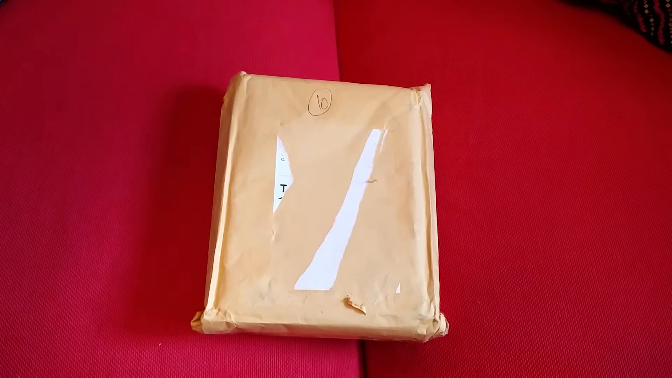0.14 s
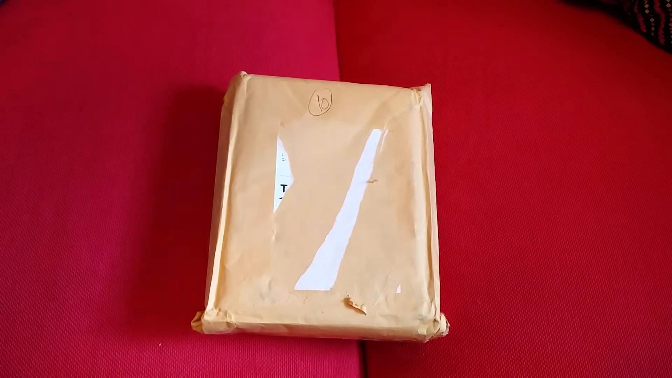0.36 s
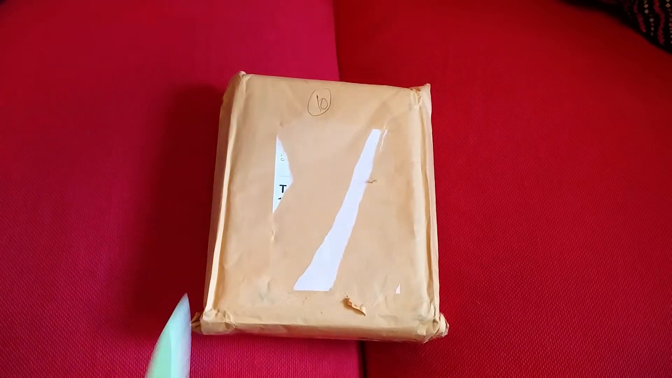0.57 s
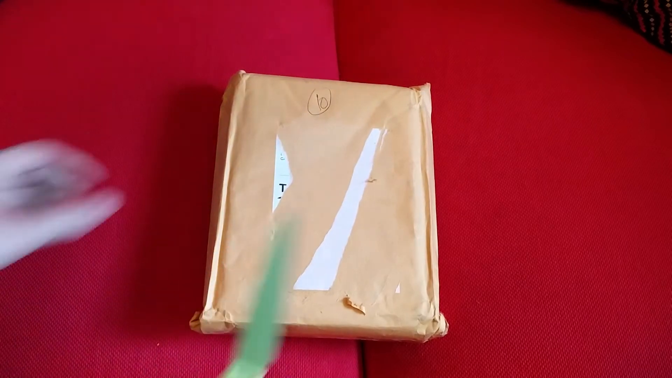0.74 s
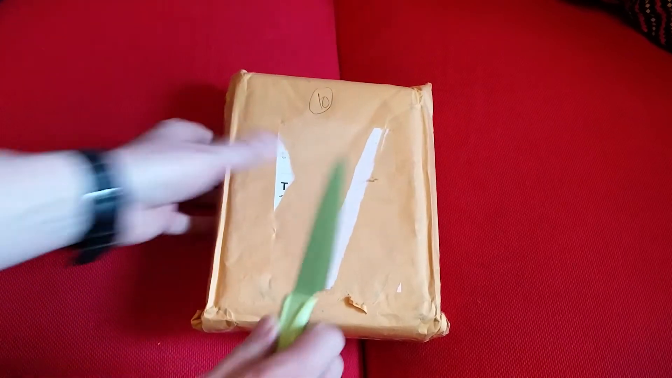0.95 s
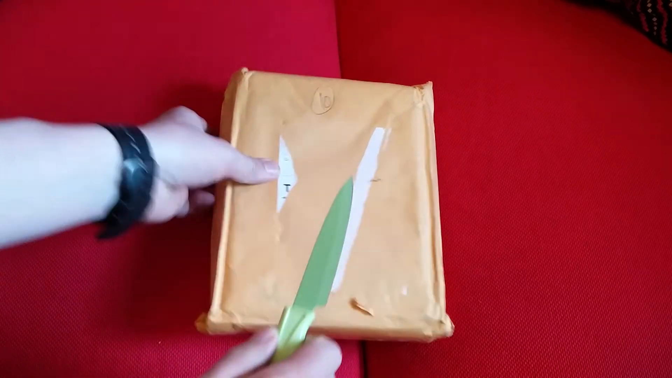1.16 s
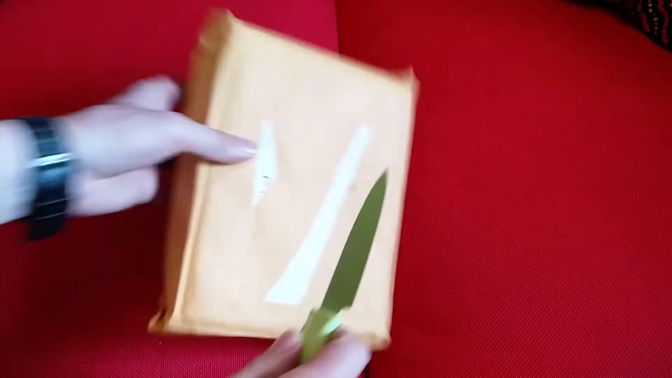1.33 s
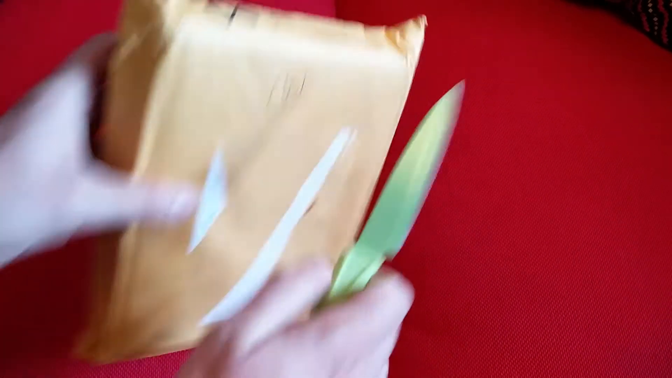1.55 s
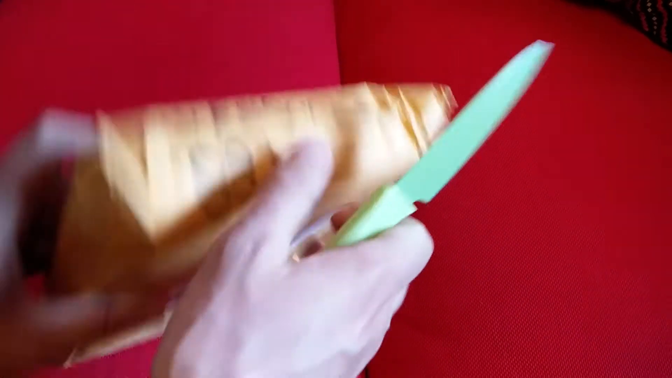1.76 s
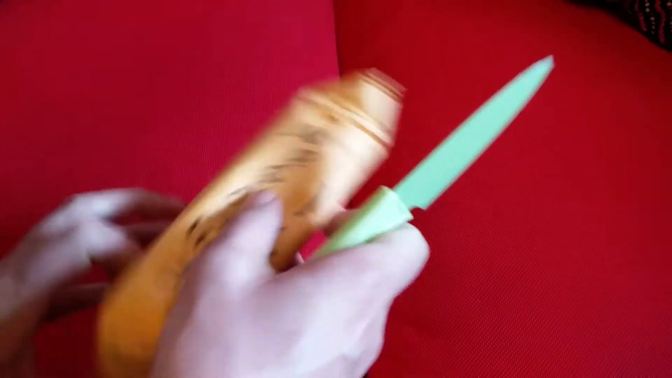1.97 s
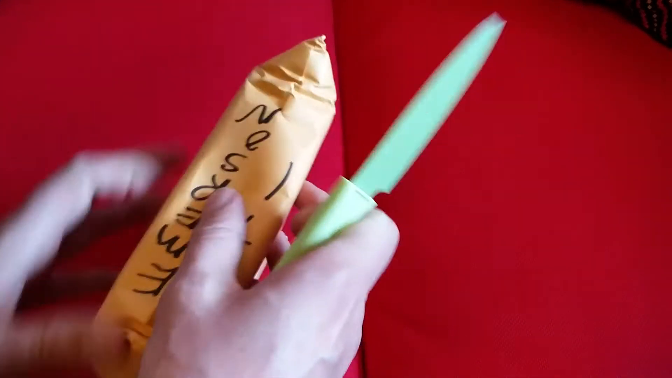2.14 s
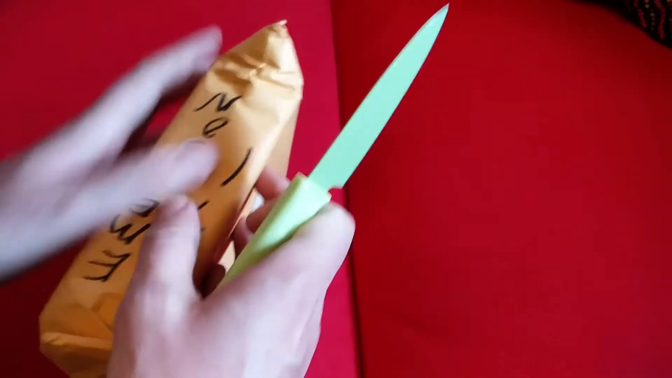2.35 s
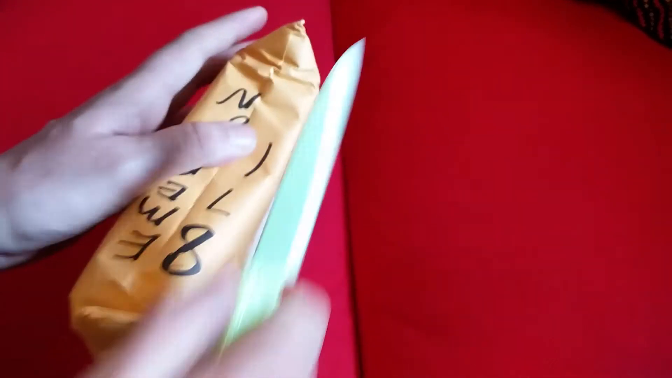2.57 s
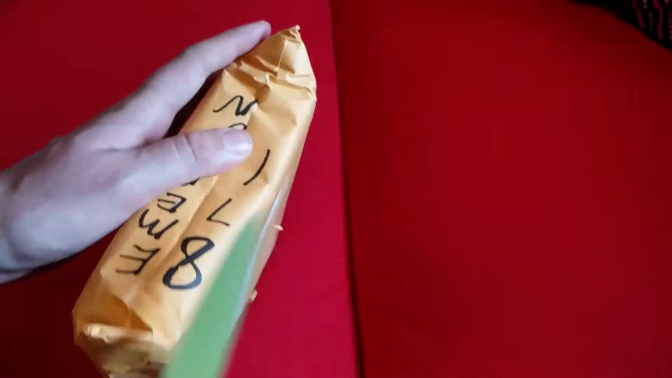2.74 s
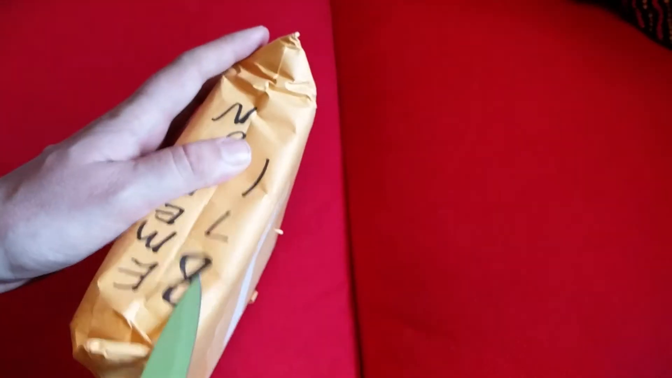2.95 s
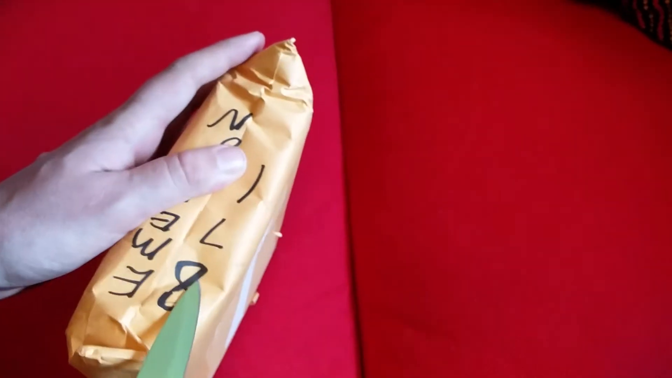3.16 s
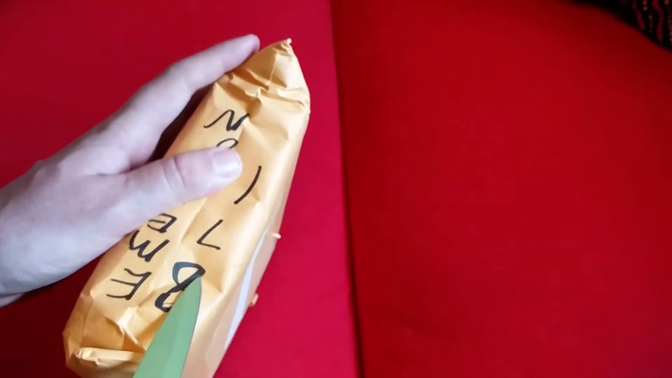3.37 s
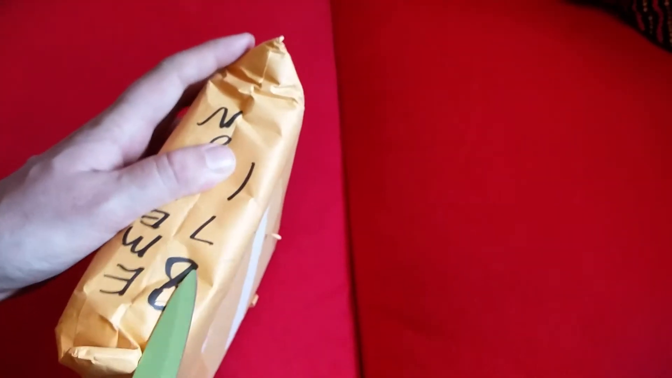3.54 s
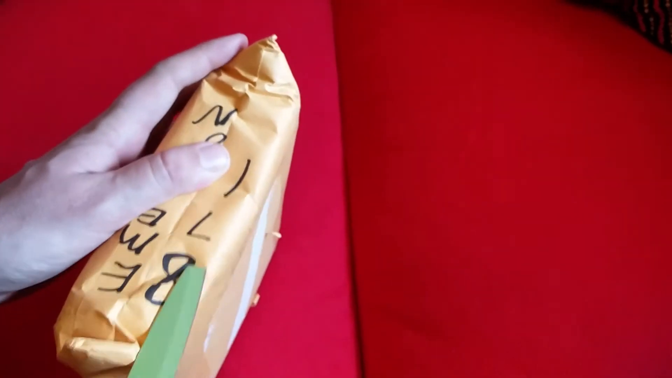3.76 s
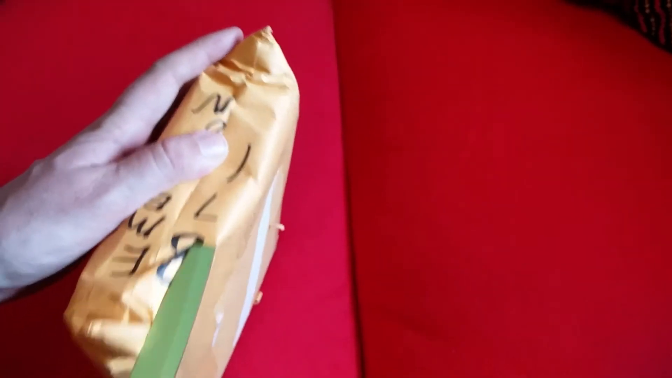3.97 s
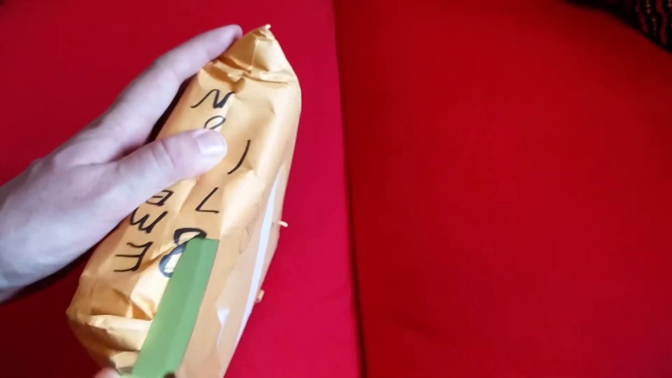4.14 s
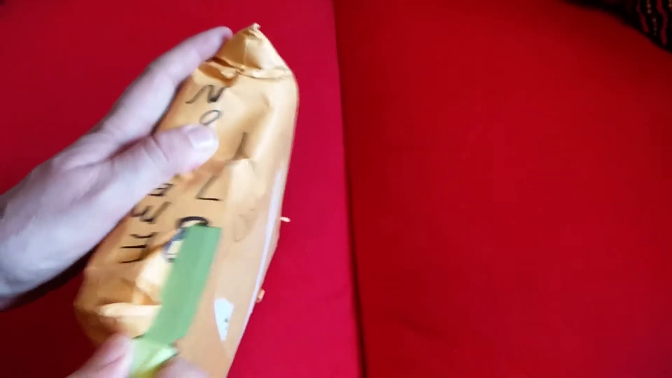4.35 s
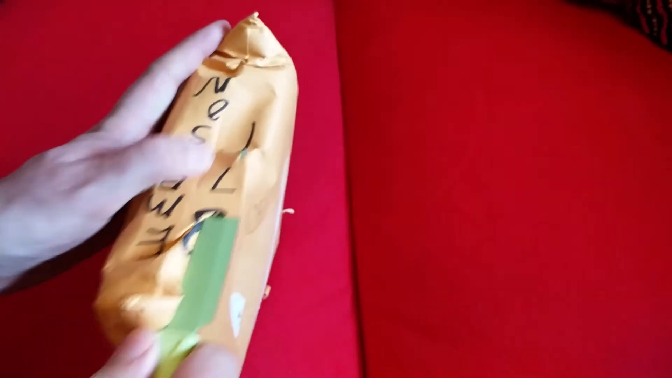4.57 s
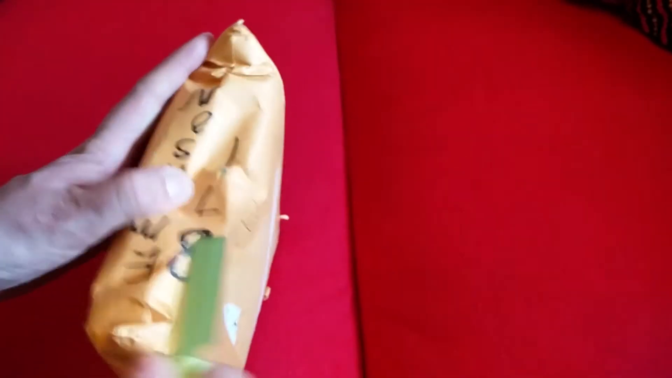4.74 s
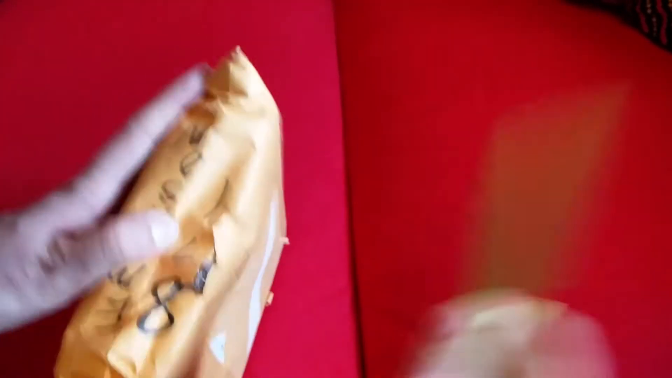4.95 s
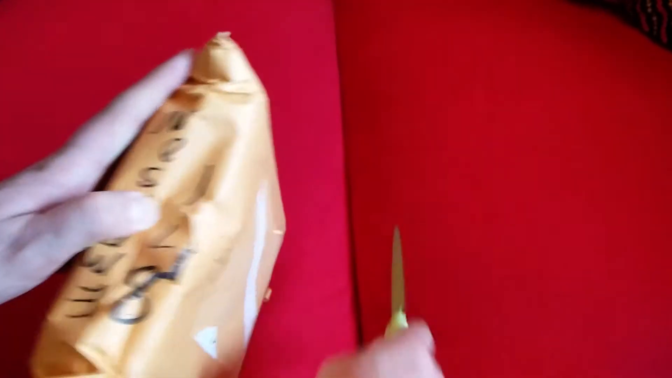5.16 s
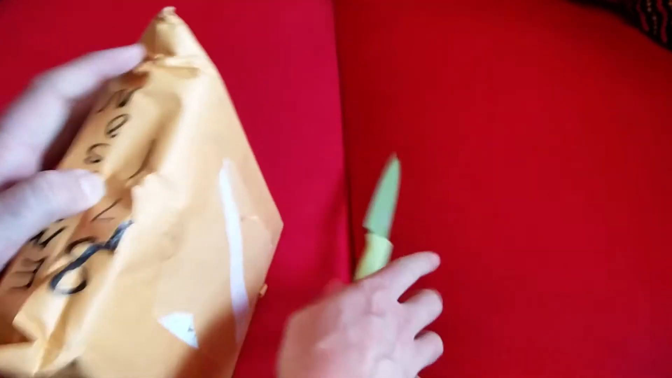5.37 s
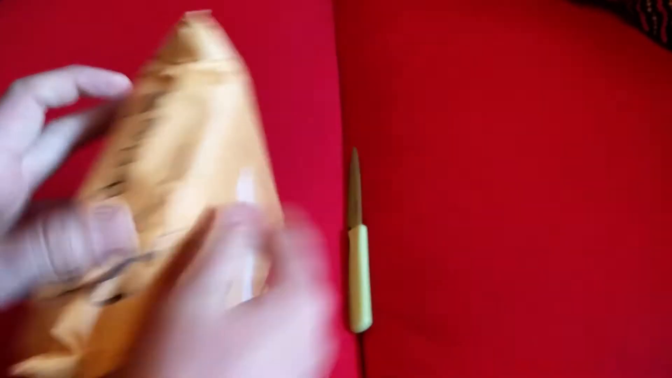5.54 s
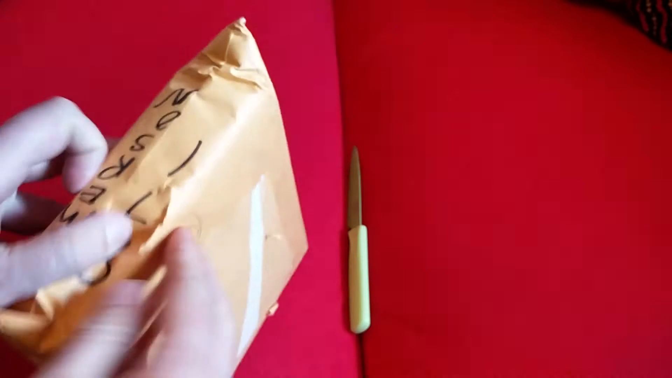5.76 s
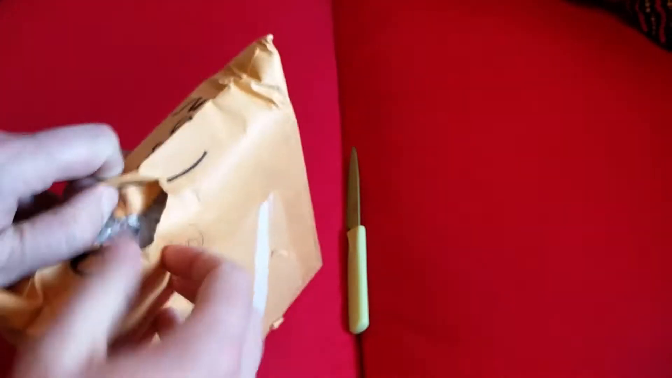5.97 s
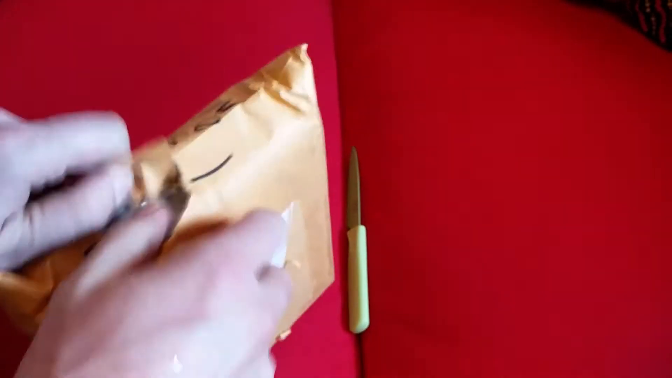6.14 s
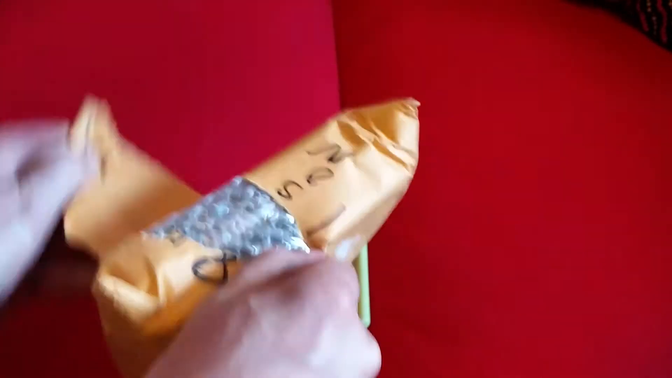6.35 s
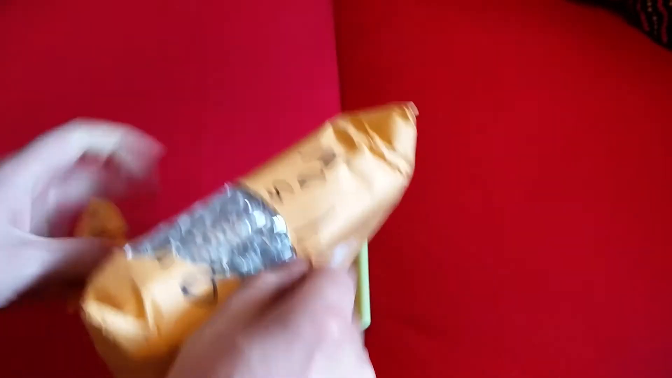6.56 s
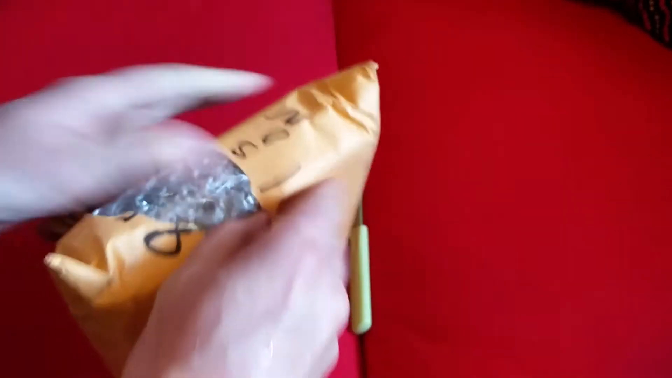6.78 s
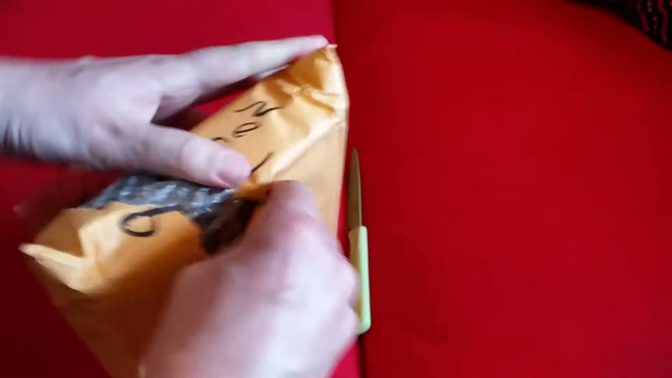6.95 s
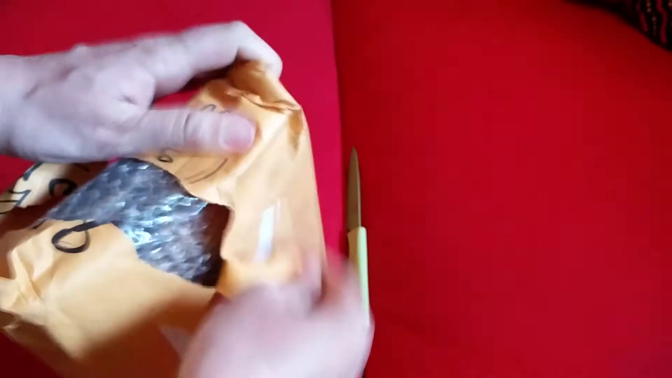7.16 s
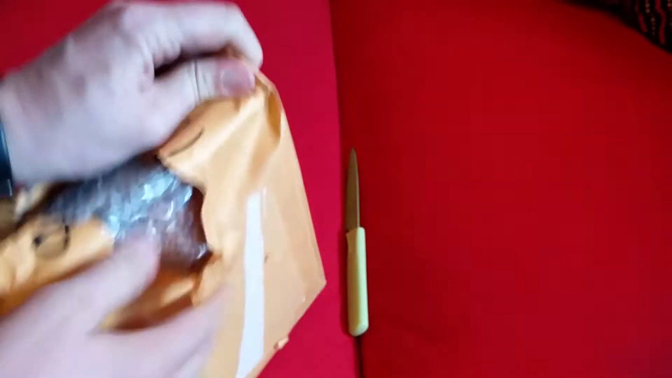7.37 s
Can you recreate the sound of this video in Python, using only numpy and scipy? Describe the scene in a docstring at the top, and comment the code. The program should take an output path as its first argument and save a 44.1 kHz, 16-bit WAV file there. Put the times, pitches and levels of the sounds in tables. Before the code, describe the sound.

Hands turn over a stiff padded paper parcel with sharp crinkles, then slit and tear it open in loud crackling rips over soft thumps.

```python
"""A padded paper parcel is lifted, turned, slit and torn by hands on a sofa in a small furnished room.
Creases snap one by one over clumped fibre crackle and panel rustle: click-started noise bursts in bands.
Small facets pop as ringing resonators; the padded body adds lumpy low noise and short sine thumps.
Two microphone ports a few centimetres apart hear it, the left one later, with soft reflections and faint air."""
import sys
import numpy as np
from scipy import signal
from scipy.fft import rfft, irfft
from scipy.io import wavfile

SR = 44100
rng = np.random.default_rng(int(sys.argv[2]) if len(sys.argv) > 2 else 0)


def bounce(signal):
    """Save signal as a 16-bit WAV file at the path given by the first command-line argument."""
    frames = np.transpose(np.atleast_2d(signal))
    limited = np.clip(frames, -1, 1)
    pcm = np.round(limited * 32767).astype(np.int16)
    wavfile.write(sys.argv[1], SR, pcm)


N = 326781

# Still air of the room. Each row: frequency in Hz, relative spectrum level in dB.
AIR_SPECTRUM = [(24, -29), (40, -6.5), (222, 5), (549, -43), (631, -3), (1000, -5), (1630, -18.5),
                (6880, -37), (10200, -38), (13300, -54), (22000, -120)]
AIR_DB = -70
# Reflections: a late tail, and first reflections off cushions and hands that start SOFA_DB above it.
ROOM_T60_S, ROOM_DB, ROOM_DULL_HZ = 0.55, -8.5, 6200
SOFA_T60_S, SOFA_DB = 0.094, 15
# Tone of the left port. Each row: frequency in Hz, level over the right port in dB.
LEFT_PORT_TONE = [(300, 0.5), (600, -3.5), (1000, 3.5), (1800, 7.5), (3200, -1.5), (5500, 1.5)]
# The hands carry the parcel across the ports. Each row: time in seconds, left over right in dB
# (centred on its mean before use), lag of the left port in milliseconds.
SIDEWAYS_PATH = [(1.2, 2.5, .14), (1.9, 1, 0.24), (2.7, 2, 0.13), (3.7, 3.5, .18), (4.4, 3.5, 0.15),
                 (5.2, 2.5, .18), (6.4, 1, .2), (7.2, 3.5, 0.12)]
CUTOFF_HZ = 10800

# Slow hold on the parcel, under all strokes. Each row: time in seconds, faint paper rustle in dB,
# padded body in dB.
GRIP_CURVE = [(0.0, -76, -66), (0.3, -79, -74.5), (0.92, -99, -94), (1.2, -80, -74), (1.6, -64, -56),
              (2.1, -49.5, -85), (2.6, -61, -55.5), (2.85, -78.5, -70), (3.35, -78, -62.5), (3.6, -71, -79),
              (4.1, -57.5, -87), (4.6, -72, -62), (5.2, -64.5, -65), (5.6, -65.5, -56), (6.1, -73, -54.5),
              (6.5, -93, -55.5), (6.77, -55, -67), (7.41, -51.5, -50)]
GRIP_FIBRE_DB = -2.5   # fibre crackle of the mere hold, over its rustle
# Strokes of fingers and blade. Each row: start in seconds, hold in seconds, panel rustle in dB,
# fibre crackle over it in dB, kneading of the padding over it in dB.
HAND_STROKES = [(0.062, 0.036, -66.5, 15, -7), (0.558, 0.029, -68, -12, -14), (0.65, 0.022, -80, -1, 13),
                (0.808, 0.066, -83, -13, 10), (0.986, 0.28, -61, -4, -1.5), (1.147, 0.1, -55, -10, -4.5),
                (1.321, 0.018, -38.5, -8.5, -7), (1.37, 0.017, -54, -18, -19),
                (1.434, 0.014, -45.5, 1.5, -14), (1.837, 0.06, -54, -2.5, -0.5),
                (1.993, 0.01, -38.5, -5, -9.5), (2.106, 0.18, -53, 4, -27),
                (2.281, 0.0087, -47.5, -14, -20), (2.406, 0.055, -57, 10.5, 6),
                (2.546, 0.13, -59.5, -3, -6), (2.94, 0.0071, -56.5, -9, -10), (3.024, 0.085, -62.5, 0, -2),
                (3.233, 0.031, -59, -1.5, -3), (3.434, 0.013, -58, -2, -14),
                (3.461, 0.013, -55.5, 5.5, -15), (3.506, 0.21, -58.5, 0, -8.5),
                (3.663, 0.14, -48, 6.5, -15), (3.942, 0.095, -54, 9.5, -16),
                (4.139, 0.069, -45.5, 3.5, -30), (4.227, 0.086, -55.5, 6.5, -18),
                (4.307, 0.062, -44, -0.5, -4.5), (4.426, 0.074, -50.5, 5, -15),
                (4.52, 0.19, -65, 11.5, -11), (4.744, 0.009, -50, -2, 2.5), (4.826, 0.074, -43.5, 4, -13),
                (4.898, 0.0054, -33.5, -7, -4.5), (5.269, 0.036, -67.5, 9, -22),
                (5.478, 0.0049, -43, -17, 1.5), (5.53, 0.0069, -50.5, 1, -8),
                (5.645, 0.094, -48, -1.5, -16), (5.782, 0.19, -46.5, 1, -7), (5.983, 0.042, -45.5, -34, 0),
                (6.17, 0.2, -39, 4, -18), (6.306, 0.042, -27, 5.5, -7), (6.54, 0.15, -52, 8, -5),
                (6.862, 0.09, -46, 6, 2), (6.977, 0.034, -34.5, 5.5, -9.5), (7.06, 0.068, -38.5, -16, -6),
                (7.112, 0.045, -34, 5.5, -5), (7.169, 0.082, -38.5, 2.5, -29), (7.356, .05, -62, 14, -7)]
ATTACK_DB_PER_S, PANEL_RELEASE_DB_PER_S, FIBRE_RELEASE_DB_PER_S = 359.5, 193.5, 210
ROLL_DB, ROLL_DB_PER_S = -15.5, 144   # the padding rolls on: level under a bump, fall after bump or stroke

# Rumble of the padding. Each row: frequency in Hz, relative spectrum level in dB.
BODY_SPECTRUM = [(26, -51.5), (45, -2), (103, 2.5), (320, -2.5), (488, -10), (614, -12), (800, 0.5),
                 (1040, -25.5), (1760, -120)]
# Bumps of the padded body. Each row: time in seconds, peak ahead of the ports in dB, pitch in Hz.
BODY_BUMPS = [(0.551, -51, 112), (0.6, -58, 70), (0.66, -60, 189), (0.816, -60, 128), (0.989, -55.5, 205),
              (1.149, -53, 195), (1.229, -38.5, 127), (1.252, -50, 121), (1.285, -39.5, 217),
              (1.45, -48, 191), (1.849, -43.5, 233), (1.979, -45, 300), (2.287, -34, 133),
              (2.284, -41, 298), (2.395, -41, 274), (2.446, -50.5, 200), (2.624, -51.5, 230),
              (3.033, -52.5, 270), (3.909, -48.5, 200), (3.938, -49.5, 264), (4.164, -40, 430),
              (4.326, -38.5, 236), (4.347, -38.5, 340), (4.413, -37, 337), (4.596, -51, 230),
              (4.818, -49, 163), (4.899, -27.5, 268), (4.908, -41, 76), (5.032, -48, 264),
              (5.442, -51, 105), (5.483, -41, 106), (5.529, -41.5, 89), (5.602, -42, 213),
              (5.759, -50, 240), (5.974, -33.5, 330), (6.195, -25, 340), (6.309, -28, 320),
              (6.344, -28.5, 334), (6.424, -31, 338), (6.549, -50.5, 206), (6.891, -38.5, 214),
              (6.968, -46, 332), (6.999, -37.5, 292), (7.104, -34.5, 323), (7.195, -42, 395),
              (7.23, -39.5, 267), (7.37, -49, 225)]

# Resonances of the taut wrapping, waxing and waning as it is bent. Each entry: pitch in Hz.
SHEET_NOTES_HZ = [910, 2137, 2754, 2990, 3965, 6200]
SHEET_WIDTH = 0.066   # bandwidth as a share of the pitch
SHEET_DB, SHEET_SWING_DB, SHEET_DRIFT_HZ = -8, 5, 8.4
# Overall tone of the paper. Each row: frequency in Hz, relative spectrum level in dB.
PAPER_SPECTRUM = [(290, -40.5), (500, -8), (620, -21), (905, -7), (1290, -7), (3120, -3), (3400, -2),
                  (4380, -6.5), (6080, -9.5), (6990, -11), (8130, -29.5), (8990, -14), (10200, -44.5),
                  (13300, -79), (22000, -120)]
# Parts of the sheet. Each row: low edge in Hz, high edge in Hz, place from fibre crackle 0 to panel
# rustle 1 (above 1 counts as 1), time in seconds for a snap's burst to fall 60 dB, level ahead of the
# paper tone in dB.
SHEET_PARTS = [(498, 996, 2.024, 0.022, 12), (1043, 1693, 1.75, 0.014, 8), (1535, 2646, 0.73, 0.011, 6.5),
               (2366, 3340, 0.29, 0.014, 4.5), (3350, 5090, 0.31, 0.015, 4.5),
               (4960, 8020, 0.023, 0.012, 8.5)]
PAPER_WIDTH = 0.97   # port difference in the bursts of the higher parts; less in the lowest one
# Creases that snap. Each row: time in seconds, click level ahead of the filters in dB, pitch set by the
# size of the crease in Hz, fall away from that pitch in dB per octave (below 0 counts as 0).
CREASE_SNAPS = [(0.105, -41, 6340, 21), (0.546, -44.5, 950, 4), (0.982, -46.5, 821, 1.5),
                (1.043, -30.5, 1790, 23), (1.138, -33, 1210, 10), (1.155, -32.5, 1210, 9),
                (1.227, -33.5, 1790, 9), (1.278, -19, 1480, 29), (1.292, -14.5, 2770, 2.5),
                (1.314, -33, 1190, 1), (1.357, -19.5, 2390, 11), (1.432, -31, 790, 19),
                (1.456, -11.5, 850, 25), (1.509, -22.5, 900, 21), (1.522, -29, 970, 16),
                (1.804, -20, 4700, 4.5), (1.854, -29, 900, 7), (1.974, -23, 1040, 7),
                (1.986, -10, 2360, 11.5), (2.189, -24.5, 1100, 21), (2.214, -44, 1000, 18),
                (2.234, -35, 950, 1), (2.284, -27, 2080, 4), (2.294, -19, 1450, 13), (2.335, -24, 1000, 11),
                (2.396, -30, 501, 9), (2.435, -30, 950, 7), (2.644, -25.5, 2320, 9.5),
                (2.691, -19.5, 1220, 18), (2.919, -30.5, 1210, -3), (3.04, -24.5, 1480, 9.5),
                (3.432, -40, 1500, -2), (3.467, -34, 1380, 19), (3.491, -28.5, 1640, -3),
                (3.52, -34, 2020, 7), (3.646, -32, 5500, 10), (3.664, -42, 2500, -4),
                (3.692, -28, 6140, 27), (3.707, -31.5, 6330, 15), (3.723, -38, 6200, 12),
                (3.745, -33, 6280, 16), (3.788, -40.5, 1100, -8), (4.164, -11.5, 930, 11.5),
                (4.225, -15, 1200, 17), (4.282, -31.5, 5800, 7), (4.325, -20.5, 910, -2.5),
                (4.343, -18, 1900, 3.5), (4.411, -13.5, 6230, 4.5), (4.444, -30, 883, -3),
                (4.457, -25, 1650, 3.5), (4.74, -22, 4270, 5.5), (4.754, -25, 1200, 12),
                (4.789, -26.5, 4120, 16), (4.818, -28, 930, -4), (4.851, -30, 880, 2),
                (4.885, -17, 1020, 12), (4.902, -5.5, 1950, 2.5), (5.115, -38, 880, 21),
                (5.386, -35.5, 1470, 5.5), (5.467, -42, 767, 13), (5.49, -26, 497, 14),
                (5.641, -31, 1110, 1), (5.685, -21, 904, 4.5), (5.782, -10, 1020, 5.5),
                (5.845, -27, 1120, 8), (5.886, -20, 930, -2), (5.93, -35, 950, -6), (5.942, -25, 3180, 21),
                (5.965, -22, 2980, 6), (5.975, 0, 6200, 3.5), (6.068, -29, 1010, 8), (6.1, -29, 1400, 4.5),
                (6.122, -26, 850, 4), (6.167, -8.5, 2740, 11.5), (6.196, -12, 890, 0.5),
                (6.244, -15.5, 3750, 8), (6.26, -11.5, 930, 10.5), (6.278, -21, 990, 1),
                (6.309, -9.5, 2420, 5), (6.322, -15, 3100, 2), (6.333, -16, 3300, 5),
                (6.345, -5.5, 3830, 13), (6.353, -27, 3580, 12), (6.424, -13, 3260, 3),
                (6.569, -24.5, 904, 2), (6.634, -16.5, 5700, 4.5), (6.661, -24.5, 1920, 8),
                (6.871, -28, 1930, -3), (6.926, -14.5, 930, 15), (6.957, -22, 2600, 1),
                (6.976, -21, 2090, 18), (7.027, -14, 3130, 11), (7.045, -8.5, 1720, 21),
                (7.065, -24, 2070, 20), (7.106, -12, 2220, 6), (7.115, -14, 2000, 5),
                (7.128, -20, 1900, 10), (7.153, -13.5, 6000, 22), (7.23, -15, 6690, 7),
                (7.238, -15.5, 2160, 3.5), (7.313, -26.5, 940, 15), (7.36, -35, 902, -1.5)]


def from_db(db):
    """Decibels to gain."""
    return 10 ** (np.asarray(db) / 20)


def rms_one(x):
    """Scale to unit power."""
    return x / np.sqrt(np.mean(x ** 2) + 1e-20)


def together(*db):
    """Levels in dB added as powers."""
    return 10 * np.log10(sum(from_db(d) ** 2 for d in db))


def in_time(rows):
    """Columns of a curve, one value a sample."""
    s, *columns = np.transpose(rows)
    return [np.interp(np.arange(N) / SR, s, c) for c in columns]


def colour(x, spectrum):
    """Causal filter of the given spectrum: minimum phase from the folded cepstrum."""
    hz, db = np.transpose(spectrum)
    grid = np.maximum(np.arange(2049) * SR / 4096, 1)
    cepstrum = irfft(np.log(from_db(np.interp(np.log(grid), np.log(hz), db))))
    cepstrum[1:2048] *= 2
    cepstrum[2049:] = 0
    impulse = irfft(np.exp(rfft(cepstrum)))
    return signal.fftconvolve(x, impulse[None], axes=-1)[..., :N]


def band(x, low_hz, high_hz):
    """Band-pass."""
    return signal.sosfilt(signal.butter(2, [low_hz, high_hz], "band", fs=SR, output="sos"), x)


def drift(rate_hz):
    """Slow random wander of spread 1: noise through two equal low-pass poles."""
    r = np.exp(-2 * np.pi * rate_hz / SR)
    noise = rng.standard_normal(N + SR)   # the first second only settles the filter
    return rms_one(signal.lfilter([1], [1, -2 * r, r * r], noise)[SR:])


def dying(clicks, t60, rise_s):
    """Each click starts an envelope that swells briefly and falls 60 dB in about t60 seconds."""
    r = np.exp(-1 / (rise_s * SR))
    poles = np.convolve([1, -r], [1, -from_db(-60 / (t60 * SR))])
    return signal.lfilter([1 - r], poles, clicks + 1e-18)


def breaks(per_s, size_db, clumps):
    """Tiny breaks come in clumps, a few far larger than the rest."""
    born = np.flatnonzero(rng.random(N) < per_s * clumps / SR)
    clicks = np.zeros(N)
    clicks[born] = from_db(size_db * np.minimum(rng.exponential(1, N)[born], 3.0))
    return clicks


def alike_bass(pair, hz):
    """Long waves reach both ports nearly alike, short ones do not."""
    low = signal.sosfilt(signal.butter(2, hz, fs=SR, output="sos"), 1.13 * pair + 0.64 * pair[::-1])
    return low + signal.sosfilt(signal.butter(2, hz, "high", fs=SR, output="sos"), pair)


def still_air():
    """Faint steady noise of the room, shared between the ports in the bass."""
    noise = alike_bass(rng.standard_normal((2, N)), 350)
    return from_db(AIR_DB) * rms_one(colour(noise, AIR_SPECTRUM))


def room(x):
    """Dense soft reflections; the hands move the parcel, so three sets of paths fade in and out in turn."""
    t, out = np.arange(SR // 2) / SR, 0
    late = from_db(-60 * t / ROOM_T60_S)
    early = from_db(SOFA_DB - 60 * t / SOFA_T60_S)
    decay = (late + early) * (1 - np.exp(-(t / 0.00055) ** 2))
    for k in range(3):
        tail = alike_bass(rng.standard_normal((2, len(t))), 485) * decay
        tail = signal.sosfilt(signal.butter(1, ROOM_DULL_HZ, fs=SR, output="sos"), tail)
        tail = tail / np.sqrt(np.sum(tail ** 2) / 2)
        turn = np.sqrt(2 / 3) * np.cos(2 * np.pi * (np.arange(N) / SR * 1.7 + k / 3))
        out = out + signal.fftconvolve((x[1] * turn)[None], tail, axes=-1)[:, :N]
    return from_db(ROOM_DB) * out


def ports(x, lag_ms):
    """The left port hears the parcel a little later and past the casing."""
    lagged = np.interp(np.arange(N) - lag_ms * SR / 1000, np.arange(N), x[0])
    return np.array([colour(lagged[None], LEFT_PORT_TONE)[0], x[1]]) * from_db(2.0)


def swells(start, hold, db, release_db_per_s):
    """Level in dB of events that rise, hold and let go, their powers added."""
    t = np.arange(0, N + 64, 64)[:, None] / SR   # one value per 64 samples
    rise = ATTACK_DB_PER_S * np.maximum(start - t, 0)
    fall = release_db_per_s * np.maximum(t - start - hold, 0)
    power = np.sum(from_db(db - rise - fall) ** 2, axis=1)
    return np.interp(np.arange(N) / SR, t[:, 0], 10 * np.log10(power + 1e-20))


def handling():
    """How hard fibres, panels and padding are worked at each moment, in dB."""
    rustle_db, knead_db = in_time(GRIP_CURVE)
    start, hold, db, fibre_over_db, body_over_db = np.transpose(HAND_STROKES)
    bump_s, bump_db, _ = np.transpose(BODY_BUMPS)
    fibre_strokes = swells(start, hold, db + fibre_over_db, FIBRE_RELEASE_DB_PER_S)
    panel_strokes = swells(start, hold, db, PANEL_RELEASE_DB_PER_S)
    body_strokes = swells(start, hold, db + body_over_db, ROLL_DB_PER_S)
    bump_rolls = swells(bump_s, 0, bump_db + ROLL_DB, ROLL_DB_PER_S)
    fibre_db = together(rustle_db + GRIP_FIBRE_DB, fibre_strokes)
    panel_db = together(rustle_db, panel_strokes)
    return fibre_db, panel_db, together(knead_db, body_strokes, bump_rolls)


def thump(db, hz):
    """A press on the padding: a sine and an overtone out of tune, falling 60 dB in 7.8 cycles."""
    t = np.arange(SR // 5) / SR
    envelope = from_db(-60 * t * hz / 7.8) * (1 - np.exp(-t * hz / 0.5))
    wave = envelope * (np.sin(2 * np.pi * hz * t) + 0.31 * np.sin(2 * np.pi * 1.5 * hz * t))
    return from_db(db) * wave / np.abs(wave).max()


def body(body_db):
    """The padding rumbles in lumps under the fingers and thumps for a few cycles when pressed."""
    presses = breaks(per_s=77.0, size_db=5.5, clumps=from_db(2.7 * drift(6.5)))
    lumps = rms_one(dying(presses, 0.07, rise_s=0.0065)) + 0.19
    rumble = rms_one(colour(lumps[None] * rng.standard_normal(N), BODY_SPECTRUM)[0])
    out = from_db(body_db) * band(rumble, 174.0, 603)
    deep_db = np.minimum(body_db, -53.5) - 5.0   # soft foam cannot carry deep notes any harder
    out += from_db(deep_db) * band(rumble, 61, 250)
    for s, db, hz in BODY_BUMPS:
        at, hit = int(s * SR), thump(db, hz)
        out[at:at + len(hit)] += hit[:N - at]
    return out


def crinkles(panel_db):
    """Small facets of paper pop in and out, each ringing a few cycles at a pitch set by its size."""
    clicks = breaks(per_s=90., size_db=1.5, clumps=from_db(5.0 * drift(14.0))) * rng.choice([-1, 1], N)
    facet, out = rng.integers(0, 14, N), 0   # which of 14 sizes each click rings
    for k, hz in enumerate(np.geomspace(850., 6200., 14)):
        r, w = from_db(-60 * hz / (16. * SR)), 2 * np.pi * hz / SR   # falls 60 dB in 16 cycles
        struck = clicks * (facet == k) + 1e-18
        out = out + signal.lfilter([0, np.sin(w)], [1, -2 * r * np.cos(w), r * r], struck)
    return from_db(panel_db - 10.0) * rms_one(out)


def sheet(x):
    """The wrapping rings at a few broad notes, each coming and going on its own."""
    out = 0
    for hz in SHEET_NOTES_HZ:
        r = np.exp(-np.pi * SHEET_WIDTH * hz / SR)
        poles = [1, -2 * r * np.cos(2 * np.pi * hz / SR), r * r]
        rung = signal.lfilter([(1 - r * r) / 2, 0, (r * r - 1) / 2], poles, x)
        out = out + from_db(SHEET_DB + SHEET_SWING_DB * drift(SHEET_DRIFT_HZ)) * rung
    return out


def paper(fibre_db, panel_db):
    """Snaps, breaks felt all over, local breaks and smooth rubbing shake each part of the sheet."""
    s, peak_db, snap_hz, fall_db = np.transpose(CREASE_SNAPS)
    clumps = from_db(4.0 * drift(23.0))
    felt_all_over = breaks(per_s=230.0, size_db=5.5, clumps=clumps)
    sign = rng.choice([-1, 1], N)
    noise, out = rng.standard_normal((2, 2, N)), 0   # neighbouring parts take turns on two noise pairs
    for k, (low_hz, high_hz, place, t60, db) in enumerate(SHEET_PARTS):
        fibre = np.clip(1 - place, 0, 1)   # share of fibre crackle against panel rustle
        rustle_db = fibre * fibre_db + (1 - fibre) * panel_db
        own = breaks(per_s=200.0, size_db=5.0, clumps=clumps)
        bursts = rms_one(dying(0.58 * felt_all_over + own, 1.35 * t60, rise_s=0.00053))
        grain = rms_one(bursts + 0.81)   # the constant is the smooth rubbing
        octaves = np.abs(np.log2(np.sqrt(low_hz * high_hz) / snap_hz))
        clicks = np.zeros(N)
        clicks[(s * SR).astype(int)] = from_db(peak_db - np.maximum(fall_db, 0) * octaves)
        shake = from_db(rustle_db + 1.68 * drift(15.0)) * grain + dying(clicks, t60, rise_s=0.00032)
        # A wide sheet reaches each port by other paths.
        apart = np.clip(PAPER_WIDTH * min(low_hz / 1040.0, 1), 0, 1)
        left, right = noise[k % 2]
        pair = np.array([np.sqrt(1 - apart ** 2) * right + apart * left, right])
        # Each snap and break opens with one clean crack.
        break_cracks = from_db(rustle_db) * rms_one(felt_all_over * sign + own)
        cracks = 3.2 * clicks + 0.26 * break_cracks
        out = out + from_db(db) * band(shake * pair + cracks, low_hz, high_hz)
    return colour(out + sheet(out), PAPER_SPECTRUM)


def scene():
    """Parcel at the ports, its reflections, and the still air of the room."""
    fibre_db, panel_db, body_db = handling()
    padding = body(body_db)
    pops = crinkles(panel_db) * np.ones((2, 1))
    sheet_sound = paper(fibre_db, panel_db)
    pan_db, lag_ms = in_time(SIDEWAYS_PATH)
    lean = from_db(np.outer([.5, -.5], pan_db - pan_db.mean()))
    direct = ports(lean * (sheet_sound + pops) + padding, lag_ms)
    reflections = room(sheet_sound + padding) + room(pops)
    return direct + reflections + still_air()


def record(dry):
    """The microphone sheds the deepest bass, peaks stop at full scale, the top is cut."""
    thin = signal.sosfilt(signal.butter(3, 55., "high", fs=SR, output="sos"), dry)
    top_cut = signal.cheby2(16, 70, CUTOFF_HZ, fs=SR, output="sos")
    return signal.sosfilt(top_cut, np.clip(thin, -1, 1))


dry = scene()
out = record(dry)
bounce(out)
```